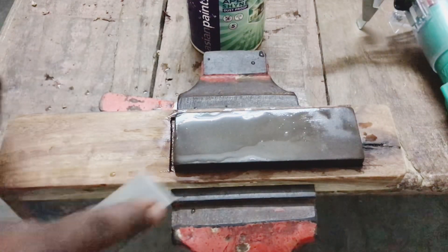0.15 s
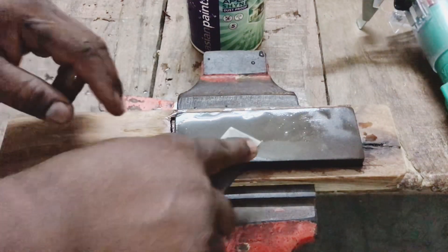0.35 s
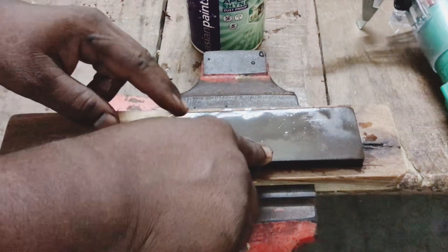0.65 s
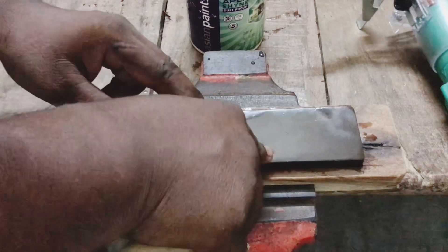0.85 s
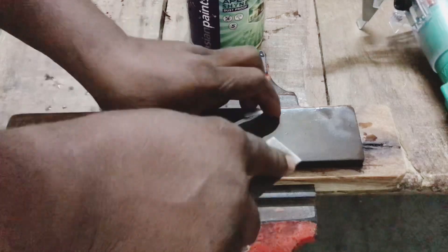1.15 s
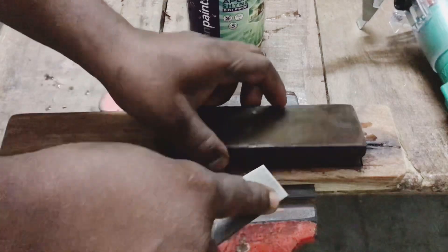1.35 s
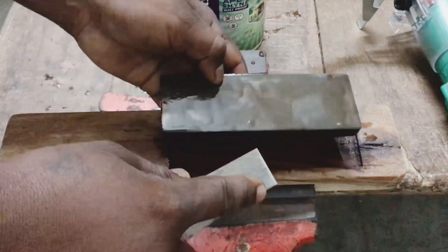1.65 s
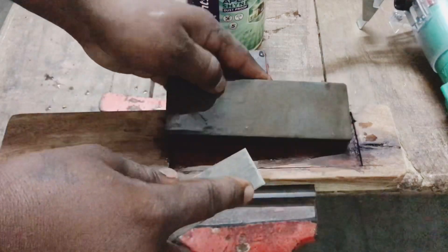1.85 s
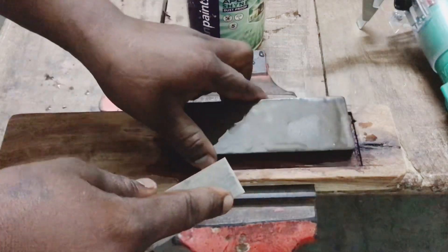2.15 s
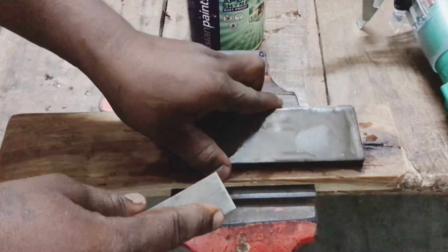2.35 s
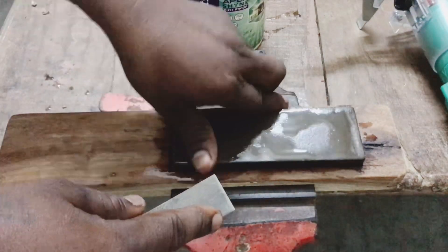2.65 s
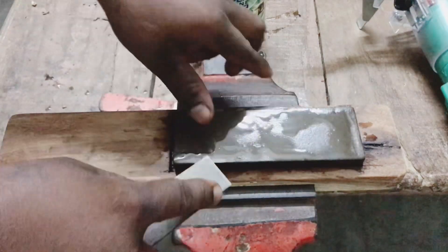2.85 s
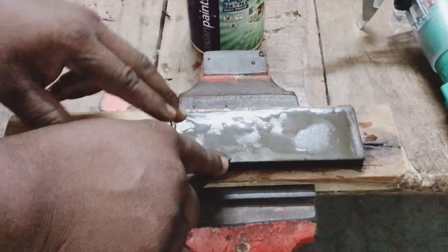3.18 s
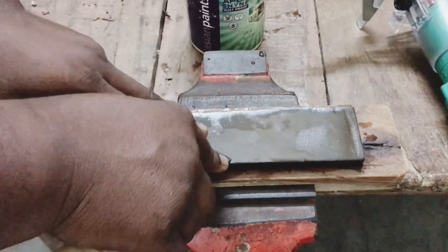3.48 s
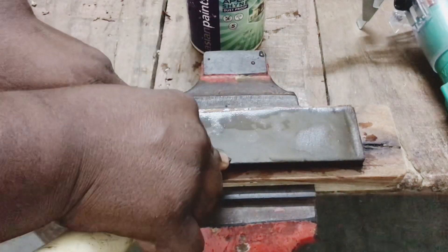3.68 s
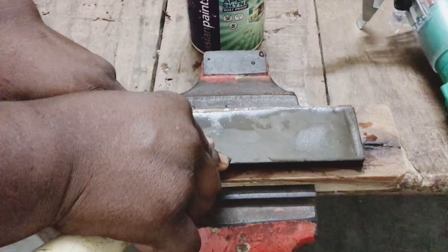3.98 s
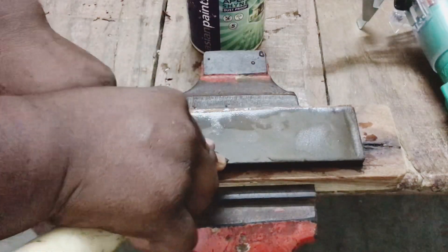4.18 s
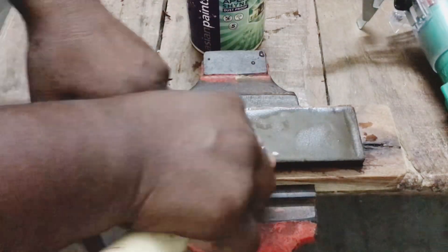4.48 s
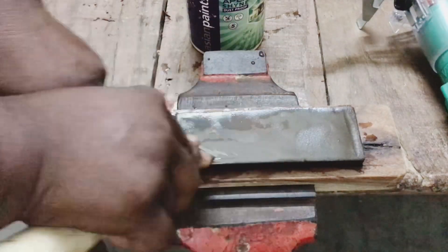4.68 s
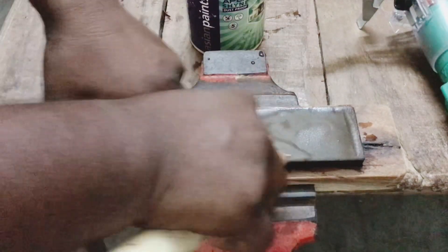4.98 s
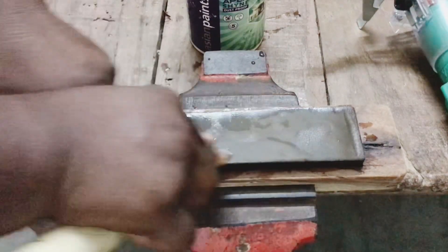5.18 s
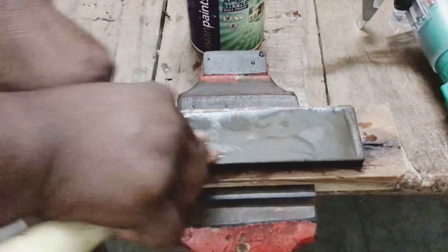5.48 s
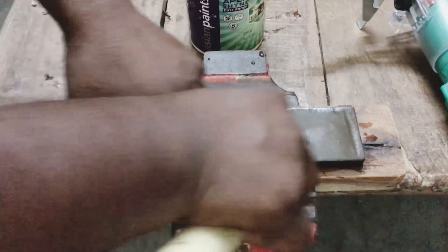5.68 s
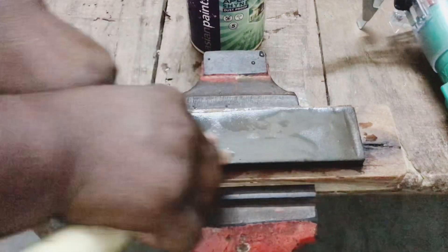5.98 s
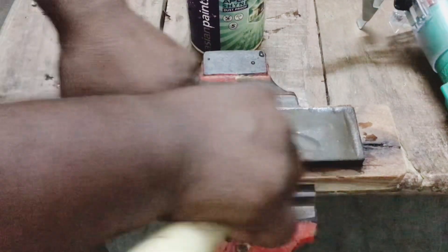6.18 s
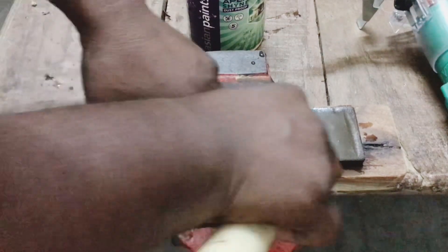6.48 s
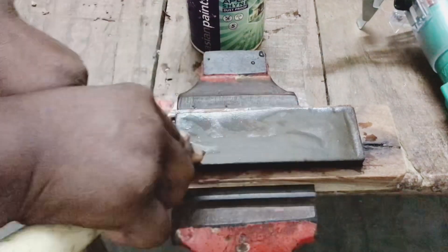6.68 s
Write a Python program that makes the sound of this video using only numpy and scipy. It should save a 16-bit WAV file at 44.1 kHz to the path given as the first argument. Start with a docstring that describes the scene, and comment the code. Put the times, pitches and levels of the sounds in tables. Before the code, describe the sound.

Chisel taps, woody stone knocks and then fast wet rasping of steel on a sharpening stone, beneath constant rumbling puffs of air on the microphone.

```python
"""Puffs of moving air thump and rumble at a phone's microphone port, over the faint hiss of a workshop.
A steel chisel taps a wet sharpening stone: each blow sets off fading tones and a short noisy crack.
The stone is turned over and knocks its way into a wooden cradle, with wet hisses as things slide.
Then the blade rubs to and fro in quick strokes: thousands of grit ticks shake its ringing tones.
The air is made of swelling noise and of single thumps about one cycle long."""
import sys
import numpy as np
from scipy import signal
from scipy.fft import rfft, irfft
from scipy.io import wavfile
from scipy.ndimage import uniform_filter1d

SR = 44100
rng = np.random.default_rng(int(sys.argv[2]) if len(sys.argv) > 2 else 0)


def invert_db(level):
    """Linear amplitude ratio for a level in decibels (20 dB per decade), elementwise."""
    return 10 ** (np.asarray(level, dtype=float) / 20)


def persist_wave(psi):
    """Save psi, clipped to +-1, as 16-bit WAV."""
    counts = np.round(np.clip(psi, -1, 1) * 32767).astype(np.int16)
    wavfile.write(sys.argv[1], SR, np.atleast_2d(counts).T)


N = 301591


def level(x, db):
    """Scale a sound to an rms level in dB."""
    return x * invert_db(db) / np.sqrt(np.mean(x ** 2))


def band(x, hz, width):
    """One resonance, which leaves its centre frequency at full strength."""
    return signal.lfilter(*signal.iirpeak(hz, hz / width, fs=SR), x)


def butter(x, hz, kind, order):
    """Butterworth filter: keeps one part of the spectrum."""
    return signal.sosfilt(signal.butter(order, hz, kind, fs=SR, output="sos"), x)


def walk(rate):
    """Slow random wander with a spread near 1: about `rate` new values a second, smoothed twice."""
    hold = int(SR / rate)
    steps = np.repeat(rng.standard_normal(N // hold + 1), hold)
    return 1.06 * uniform_filter1d(uniform_filter1d(steps, hold), hold)[:N]


def add(out, s, sound):
    """Mix a sound in, starting at time s in seconds."""
    i = int(s * SR)
    out[i:i + len(sound)] += sound[:N - i]


def swells(rows, edge_db, squareness):
    """Level of humps that rise and fall away, and the last column of whichever hump is loudest."""
    peak_s, rise_s, fall_s, db, extra = np.transpose(rows)[:, :, None]
    t = np.arange(0, N, 32)[None] / SR
    side_s = np.maximum(np.where(t < peak_s, rise_s, fall_s), 0.01)
    away = np.abs(t - peak_s) / side_s
    # a hump is edge_db down after one rise or fall time; squareness flattens its top
    humps = np.maximum(db + edge_db * away ** squareness, -120)
    loudest = np.argmax(humps, axis=0)
    smooth = uniform_filter1d(extra[loudest, 0], size=20)
    return [np.interp(np.arange(N) / SR, t[0], c) for c in (np.max(humps, axis=0), smooth)]


def ring(modes, blur, tilt_db=0):
    """One blow: each mode is a fading tone, and loose contact (blur) makes its pitch tremble."""
    hz, db, t60 = np.transpose(modes)[:, :, None]
    t = np.arange(SR // 2) / SR
    noise = rng.standard_normal((len(hz), len(t)))
    tremble = uniform_filter1d(noise, size=144, axis=1) * np.sqrt(144)
    tremble = uniform_filter1d(tremble, size=100, axis=1)
    phase = 2 * np.pi * np.cumsum(hz * (1 + blur * tremble), axis=1) / SR
    gain = invert_db(db + tilt_db * np.log2(hz / 3400))
    fade = np.exp(-np.log(1000) * t / t60)
    # the hand soaks up most of the ring at once
    grip = np.exp(-t / 0.0096) + invert_db(-11)
    contact = 1 - np.exp(-t / 0.00028)  # the blow takes a moment to build up
    return grip * contact * np.sum(gain * fade * np.sin(phase), axis=0)


def crack(decay_s):
    """The first broadband tick of hard contact: a fading burst of noise."""
    t = np.arange(SR // 20) / SR
    return rng.standard_normal(len(t)) * np.exp(-t / decay_s)


# Chisel blows on the stone, levels relative:
# t/s, level/dB, brightness/dB per octave, handle level/dB, crack level/dB
CHISEL_TAPS = [(.676, -55.5, -10, 3.5, -28), (.691, -40.5, -8, 12, -15.5), (3.255, -57.5, 2, 1, -13),
               (3.265, -32, -1, 2, 1.5), (3.271, -45.5, 2, -6, -10)]
# Ringing tones of the steel: f/Hz, relative level/dB, time to fade by 60 dB without the hand/s
CHISEL_MODES = [(3270, -5, .25), (3500, -4.5, 0.21), (3700, -6, 0.32), (3710, -9.5, 0.22),
                (3900, -14.5, 0.24), (4420, -7, 0.33), (4930, -5.5, 0.16), (5720, -4, 0.086),
                (6070, -6, 0.14), (6700, -11, 0.11), (7130, -9.5, 0.16), (7400, -17, .1),
                (9200, -17.5, 0.048)]
# Ringing tones of the handle: f/Hz, relative level/dB, time to fade by 60 dB without the hand/s
HANDLE_MODES = [(1124, -0.5, 0.45), (1310, -6.5, 0.056), (1470, -16.5, 0.084)]


def taps():
    """The chisel taps the stone: steel and handle ring together after a bright crack."""
    out = np.zeros(N)
    for s, db, tilt_db, handle_db, crack_db in CHISEL_TAPS:
        steel = ring(CHISEL_MODES, 0.007, tilt_db)
        handle = invert_db(handle_db) * ring(HANDLE_MODES, 0.005)
        add(out, s, invert_db(db - 5.5) * (steel + handle))
        add(out, s, invert_db(db + crack_db) * butter(crack(0.0029), 2700, "high", order=3))
    return out


# Blows of stone on wood, levels relative: t/s, level/dB, board level/dB, crack level/dB
STONE_KNOCKS = [(1.7987, -10.5, 10, 4), (1.821, -22.5, -13.5, -24.5), (1.845, -31.5, 3.5, -11),
                (2.1335, -20.5, -14.5, -13.5), (2.1426, -8, -10, -15.5), (2.15, -25.5, -14.5, -16.5),
                (2.177, -27.5, 9.5, -16.5), (2.196, -17.5, -20.5, -8.5), (2.213, -21, -21, -10.5),
                (2.3068, -9, -5.5, -19), (2.319, -19, -1.5, -12), (2.323, -13.5, -21, -15.5),
                (2.33, -26.5, -23, -16.5)]
# Ringing tones of the stone: f/Hz, relative level/dB, time to fade by 60 dB without the hand/s
STONE_MODES = [(506, -9, 0.22), (1290, -7, .16), (1083, -18.5, 0.027), (1160, -4.5, 0.11),
               (1450, -0.5, 0.25), (1692, 4.5, .1), (1748, -0.5, 0.35), (1854, -4.5, .08),
               (2137, -10, 0.16), (1930, -7.5, 0.15), (2164, -11.5, .25), (5040, -21.5, 0.09)]
# Ringing tones of the board: f/Hz, relative level/dB, time to fade by 60 dB without the hand/s
BOARD_MODES = [(476, -25.5, .12), (514, -14, 0.098), (615, -8, 0.17), (714, 2, 0.53), (804, -16.5, .1),
               (920, -3.5, 0.033), (1260, -8, 0.34), (3010, -13, 0.14)]


def knocks():
    """The stone lands on the board and rattles home: both ring after a dull crack."""
    out = np.zeros(N)
    for s, db, board_db, crack_db in STONE_KNOCKS:
        stone = ring(STONE_MODES, 0.006)
        board = invert_db(board_db) * ring(BOARD_MODES, 0.013)
        add(out, s, invert_db(db - 15.0) * (stone + board))
        add(out, s, invert_db(db + crack_db) * butter(crack(0.0037), 3000, "low", order=2))
    return out


# Slides after some of the blows: start t/s, relative level/dB, hold/s, fade/dB per s
SLIDE_EVENTS = [(1.803, -49, 0.03, 121.5), (2.134, -53.5, 0.11, 245), (2.307, -53.5, .05, 109),
                (3.262, -54, 0.063, 296.5)]


def sliding():
    """Wet grit hisses while stone and steel slide into place: filtered noise under a quick envelope."""
    s, db, hold_s, fade = np.transpose(SLIDE_EVENTS)[:, :, None]
    t = np.arange(N) / SR - s
    attack_db = 3001 * np.minimum(t, 0)  # 3001 dB per s
    fade_db = fade * np.maximum(t - hold_s, 0)
    slide_db = np.max(db + attack_db - fade_db, axis=0)
    hiss = butter(butter(rng.standard_normal(N), 4000, "high", order=4), 4700, "low", order=1)
    return invert_db(slide_db + 1.3 * walk(210)) * level(hiss, -1.3)


# Strokes of the blade, looseness frees its lower rings:
# fastest at t/s, rise/s, fall/s, relative level/dB, looseness/dB
BLADE_STROKES = [(4.499, 0.082, 0.12, -44.5, 5), (4.715, 0.075, 0.1, -43.5, 1.5),
                 (4.917, 0.095, 0.088, -43.5, -1), (5.086, 0.034, 0.13, -44.0, -6),
                 (5.311, 0.084, 0.093, -42, -9.5), (5.541, 0.087, 0.061, -43, -11),
                 (5.705, 0.065, 0.11, -44.5, -5.5), (5.946, 0.086, 0.042, -45.5, -3),
                 (6.102, 0.058, 0.087, -48, -14), (6.329, 0.082, 0.057, -49, 0),
                 (6.508, 0.08, 0.071, -45, -2.5), (6.693, 0.04, 0.071, -47.5, 2.5)]
# Rings of the rubbing blade: f/Hz, nominal width/Hz (the filters below scale it)
BLADE_RINGS = [(6732, 960), (8977, 800), (6056, 370), (5180, 700), (4096, 1500)]
# Relative level of each blade ring: level/dB
BLADE_RING_LEVELS = [1, -5.5, -7, -19, -24]
# How much each blade ring follows looseness and speed: share (no unit)
BLADE_LOOSE_SHARES = [0, 0, 0.59, 1.1, 2.1]
# How far each blade ring wanders in level: spread/dB
BLADE_RING_WANDERS = [0.46, 1.5, 3.2, 6, 4.5]
GRIT_PER_S, GRIT_SPREAD_DB, SLURRY_DB = 5000, 2.5, -8
RING_SHIFT, RING_SHIFT_DB = 0.019, 5.5  # each ring leans up or down by this share as the grip changes
DRAG_DB = -17  # light contact that lasts into each turn of the hand
SPEED_SHARE, USUAL_STROKE_DB = 0.55, -42.5  # how much the lower rings follow the speed of the blade


def narrow(x, hz, width):
    """A steep resonance: the same narrow filter three times in a row."""
    for _ in range(3):
        x = band(x, hz, 0.83 * width)
    return x


def strokes():
    """Grains of grit tick against the bevel and shake the blade's rings; the slurry hisses beneath."""
    scrape_db, loose_db = swells(BLADE_STROKES, -27, 5.7)
    speed_db = swells(BLADE_STROKES, -12, 1.7)[0]
    drag_db = DRAG_DB + speed_db
    chance = rng.random((3, N))
    ticks = (chance[0] < GRIT_PER_S / SR) * np.sign(chance[1] - 0.5)
    grit = ticks * invert_db(-GRIT_SPREAD_DB * np.log(chance[2] + 1e-4))
    # the bevel bites unevenly along the stone
    grit = grit * invert_db(2.2 * walk(150))
    out = level(butter(grit, [450, 3600], "band", order=1), SLURRY_DB)
    lean_db = RING_SHIFT_DB * np.tanh(walk(9.8))
    # the lower rings sound most where the blade moves fastest
    free_db = loose_db + SPEED_SHARE * (speed_db - USUAL_STROKE_DB)
    settings = zip(BLADE_RINGS, BLADE_RING_LEVELS, BLADE_LOOSE_SHARES, BLADE_RING_WANDERS)
    for (hz, width), db, share, wander_db in settings:
        low = narrow(grit, hz * (1 - RING_SHIFT), width)
        high = narrow(grit, hz * (1 + RING_SHIFT), width)
        ringing = low * invert_db(-lean_db) + high * invert_db(lean_db)
        ringing = ringing / np.hypot(invert_db(-lean_db), invert_db(lean_db))
        out = out + invert_db(share * free_db + wander_db * walk(22)) * level(ringing, db)
    return (invert_db(scrape_db) + invert_db(drag_db)) * out


# Squeaks out of the rubbing and handling:
# start t/s, length/s, f/Hz, width of each of two filters/Hz, level before fading in and out/dB
SQUEAKS = [(0.344, 0.048, 3900, 118, -65.5), (0.406, 0.039, 1033, 90, -49), (0.848, 0.089, 697, 38.4, -56),
           (1.281, 0.073, 582, 60, -51), (2.102, .03, 1300, 154, -44.5), (2.438, 0.069, 1734, 40, -49),
           (4.428, 0.1, 2160, 119.3, -54.5), (4.723, 0.085, 2250, 69, -56.5), (5.134, 0.06, 468, 49.5, -48),
           (5.24, 0.087, 2320, 109, -50), (5.232, 0.19, 2013, 120, -52), (5.336, 0.047, 512, 30, -46),
           (5.38, 0.059, 456, 68, -40.5), (5.526, 0.028, 442, 50.3, -45.5),
           (5.734, 0.036, 1621, 58.8, -50.5), (6.036, 0.068, 2200, 80, -59), (6.131, 0.035, 2260, 70, -53),
           (6.142, 0.059, 1910, 92, -49), (6.297, 0.038, 1022, 70, -46), (6.423, 0.09, 2406, 109, -56),
           (6.502, 0.095, 2246, 109.5, -51.5), (6.503, 0.092, 1612, 55, -54),
           (6.515, 0.063, 468, 73, -42.5)]


def squeaks():
    """Short squeaks: narrow, wavering bands of noise that open and close quickly."""
    out = np.zeros(N)
    for s, length, hz, width, db in SQUEAKS:
        noise = rng.standard_normal(SR // 2)
        settled = band(band(noise, hz, width), hz, width)[SR // 4:]
        tone = level(settled[:int(length * SR)], db)
        add(out, s, tone * signal.windows.tukey(len(tone), 0.4))
    return out


# Puffs of air over the port, levels relative:
# strongest at t/s, rise/s, fall/s, rumble level/dB, upper rumble level/dB
AIR_PUFFS = [(0.107, 0.13, 0.122, -31.5, -9.5), (0.282, 0.159, 0.049, -29.5, -6.5),
             (0.421, 0.1, 0.022, -28.5, -5.5), (0.469, 0.025, 0.069, -31, -10.5),
             (0.63, 0.068, 0.058, -32.5, -18), (0.794, 0.1, 0.132, -32.5, -7.5),
             (1.015, 0.054, 0.16, -29, -10.5), (1.283, 0.092, 0.084, -29, -8.5),
             (1.457, 0.056, 0.12, -34.5, -24.5), (1.718, 0.19, 0.058, -29, -7.5),
             (1.801, 0.055, 0.084, -25.5, -12.0), (1.969, 0.086, 0.13, -25.5, -11),
             (2.204, 0.14, 0.11, -30, -18), (2.501, 0.13, 0.017, -24, -9),
             (2.576, 0.15, 0.094, -32.5, -9.5), (2.698, 0.049, 0.32, -35.5, -22.5),
             (2.842, 0.14, 0.049, -39.5, -19.5), (2.947, 0.052, 0.041, -33.5, -8.5),
             (3.077, 0.056, 0.136, -34.5, -19.5), (3.337, 0.042, 0.055, -37.5, -30.5),
             (3.41, 0.094, 0.108, -34, -20.0), (3.532, 0.11, 0.11, -31.5, -21.5),
             (3.712, 0.042, 0.101, -33.5, -4.5), (3.993, 0.11, 0.09, -27, -20),
             (4.24, 0.104, 0.166, -29, -11), (4.369, 0.045, 0.17, -30, -22),
             (4.667, 0.081, 0.045, -30, -19), (4.923, 0.079, 0.12, -31, -14.5),
             (5.123, 0.17, 0.02, -41.5, -20.5), (5.163, 0.024, 0.11, -36, -31),
             (5.304, 0.1, 0.069, -32, -13), (5.532, 0.12, 0.1, -31.5, -11),
             (5.848, 0.17, 0.081, -33.5, -5.5), (6.019, 0.45, 0.121, -33.5, -19),
             (6.314, 0.049, 0.15, -31.5, -6), (6.4, 0.15, 0.104, -44, -15),
             (6.622, 0.057, 0.088, -33.5, -30.5), (6.783, 0.083, 0.13, -37.5, -18)]
# Single eddies that thump the membrane, levels relative: t/s, level/dB, f/Hz, rough edge level/dB
AIR_EDDIES = [(0.1, -12, 195, -15), (0.246, -16.5, 181, -44), (0.294, -16.5, 194, -38.5),
              (0.324, -20, 179, -48), (0.41, -6, 247, -14.5), (0.477, -16.5, 162, -44),
              (0.777, -16, 131, -25.5), (0.834, -12.5, 147, -51), (0.993, -16, 150.4, -45),
              (1.044, -13.5, 238, -17.5), (1.277, -12, 244, -25), (1.311, -17.5, 146, -34),
              (1.457, -18, 128.2, -54), (1.683, -9, 241.3, -10), (1.709, -19.5, 163, -14),
              (1.775, -13.5, 167.3, -22.5), (1.932, -14, 180, -43), (1.971, -18, 143, -47),
              (1.999, -14, 168.6, -9), (2.035, -16, 166, -61), (2.099, -19, 155, -16),
              (2.453, -24, 121, -36), (2.475, -14.5, 234, -8.5), (2.501, -8.5, 200, -15),
              (2.603, -20, 195.7, -51), (2.675, -19, 155.5, -51.5), (2.708, -10.5, 177, -34),
              (2.842, -20.5, 169.3, -38), (2.918, -19.5, 215.4, -31.5), (2.954, -19.5, 133.4, -22),
              (3.069, -15.5, 161, -48.5), (3.113, -19, 128.2, -47), (3.416, -19, 127.8, -35),
              (3.701, -19.5, 154, -51), (3.726, -18, 151.5, -42.5), (3.96, -18.5, 144, -44),
              (4.189, -18.5, 207.3, -29.5), (4.253, -15, 177.4, -26.5), (4.31, -16.5, 134.5, -49),
              (4.359, -21, 151.4, -51.5), (4.397, -16.5, 133.4, -54.5), (4.895, -17, 127, -24),
              (4.933, -13, 207, -46), (5.169, -21, 111, -32), (5.267, -20.5, 185, -21),
              (5.54, -14, 160, -33), (5.792, -14.5, 148, -44), (5.851, -12, 180, -57),
              (5.957, -19, 195, -25), (6.055, -21.5, 126.4, -39), (6.316, -12, 146, -7.5),
              (6.348, -14.5, 214, -13), (6.377, -22, 166, -23.5), (6.417, -20, 122, -47.5),
              (6.786, -20, 136, -31.5)]


def wind():
    """Lumpy rumble, lone eddies of about one cycle with a rougher edge, and hiss that follows their force."""
    low_db, upper_db = swells(AIR_PUFFS, -28.5, 3.27)
    push = invert_db(low_db + 3 * walk(40))
    upper_push = push * invert_db(upper_db + 5.5 * walk(25))
    low, upper = rng.standard_normal((2, N))
    out = invert_db(21.5) * butter(push * low, [75, 200], "band", order=3)
    out += invert_db(17) * butter(upper_push * upper, [240, 380], "band", order=5)
    t = np.arange(-1500, 1500) / SR
    phases = np.pi + 2.11 * rng.standard_normal(len(AIR_EDDIES))
    for (s, db, hz, edge_db), phase in zip(AIR_EDDIES, phases):
        swing = np.exp(-(t * hz / 0.51) ** 2) * np.cos(2 * np.pi * hz * t + phase)
        add(out, s + t[0], invert_db(db + 1.0) * swing)
        edge = butter(rng.standard_normal(len(t)), [420, 720], "band", order=4)
        add(out, s + t[0], invert_db(db + edge_db + 4) * edge * np.exp(-(t / 0.011) ** 2))
    force = uniform_filter1d(np.abs(out), size=200)
    hiss = butter(rng.standard_normal(N), [2000, 9300], "band", order=2)
    return out + invert_db(-32.0) * force * hiss


# Colour of the steady hiss: f/Hz, relative level/dB (per Hz)
ROOM_COLOUR = [(24, -41), (40, -27), (366, 4), (626, -7.5), (909, -1), (2100, -5.5), (2850, -15.5),
               (3510, -14.5), (4870, -20), (7070, -23), (10500, -35.5), (13600, -50), (22000, -120)]


def workshop():
    """Steady hiss of the room and the microphone: coloured noise, wavering a little."""
    hz, db = np.transpose(ROOM_COLOUR)
    f = np.arange(N // 2 + 1) * SR / N + 1
    colour = invert_db(np.interp(np.log(f), np.log(hz), db))
    hiss = irfft(rfft(rng.standard_normal(N)) * colour, N)
    return level(hiss, -62) * invert_db(0.4 * walk(7.8))


def echo(blows):
    """Walls return the blows as a fading, dulled wash that starts 6 ms later."""
    t = np.arange(SR // 2) / SR
    walls = butter(rng.standard_normal(len(t)), 3300, "low", order=1)
    walls = walls * np.exp(-np.log(1000) * t / 0.47) * (t > 0.006)  # falls by 60 dB in 0.47 s
    walls = walls * invert_db(-11.5) / np.sqrt(np.sum(walls ** 2))
    return signal.fftconvolve(blows, walls)[:N]


def scene():
    """Taps and knocks echo from the walls; wind acts on the port alone."""
    blows = taps() + knocks()
    handling = sliding() + strokes() + squeaks()
    return (blows + echo(blows) + handling + wind() + workshop())[None]


def suppress(x):
    """Noise suppressor: each band opens only while it stands well above its own quiet level."""
    z = signal.stft(x, nperseg=1024, noverlap=768)[2]
    power = uniform_filter1d(uniform_filter1d(np.abs(z) ** 2, size=9, axis=1), size=7, axis=2)
    db = 10 * np.log10(power + 1e-20)
    over_db = db - np.percentile(db, 15, axis=2, keepdims=True)
    # the full 8 dB cut up to 14 dB above the quiet level, none from 25 dB
    cut = np.clip((25 - over_db) / 11, 0, 1)
    return signal.istft(z * invert_db(-8 * cut), nperseg=1024, noverlap=768)[1][:, :N]


def roll_off(x):
    """The treble ends steeply here."""
    return signal.sosfilt(signal.butter(12, 10970, fs=SR, output="sos"), x)


def record(dry):
    """The phone rounds the loudest peaks, suppresses steady noise, turns down deep bass and cuts the top."""
    x = suppress(np.tanh(1.4 * dry) / 1.4)
    x = butter(x, 66, "high", order=7) + invert_db(-11) * butter(x, 69, "low", order=3)
    x = butter(x, 8400, "low", order=3)
    mix = signal.sosfilt(signal.ellip(8, 0.5, 70, 10050, fs=SR, output="sos"), x)  # steep cut at 10050 Hz
    return roll_off(mix)


dry = scene()
out = record(dry)
persist_wave(out)
```